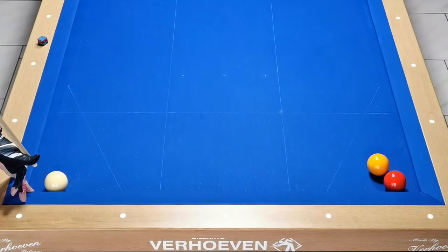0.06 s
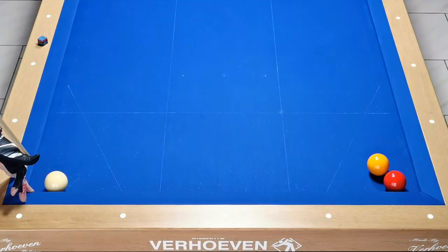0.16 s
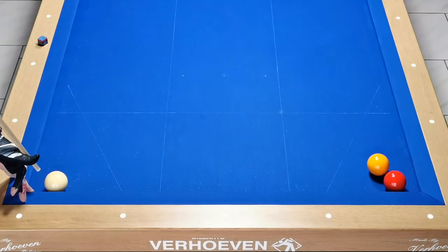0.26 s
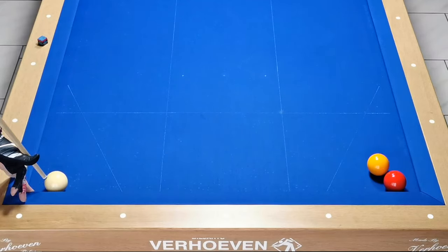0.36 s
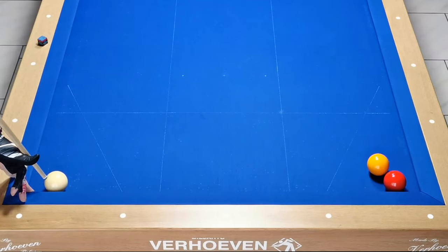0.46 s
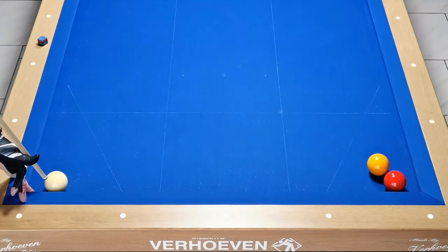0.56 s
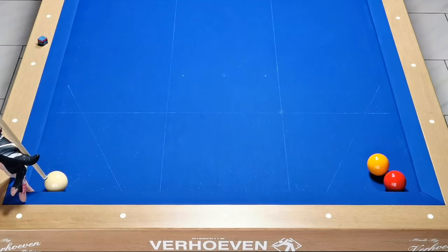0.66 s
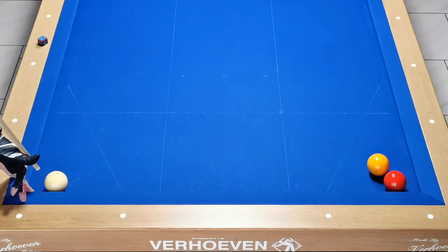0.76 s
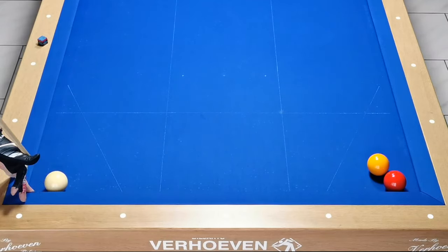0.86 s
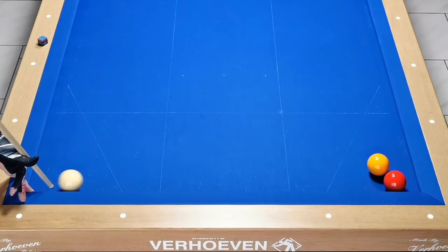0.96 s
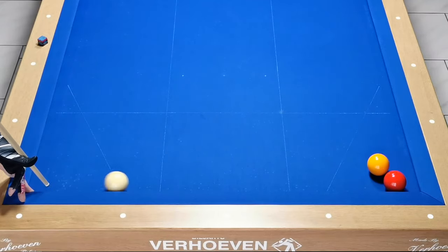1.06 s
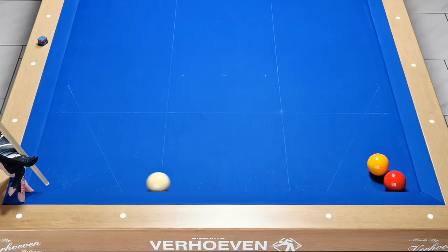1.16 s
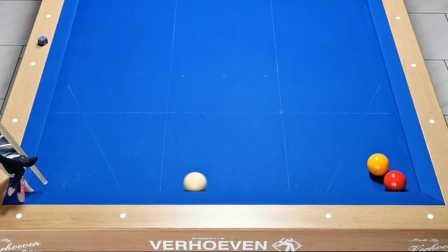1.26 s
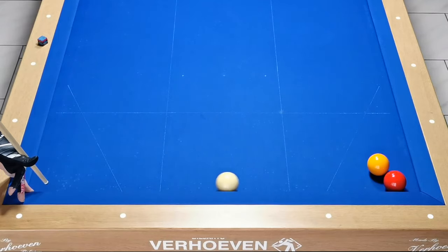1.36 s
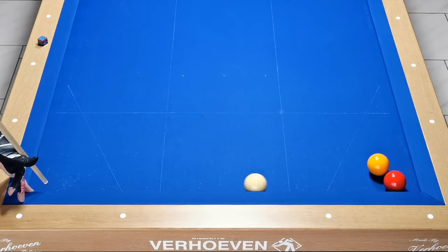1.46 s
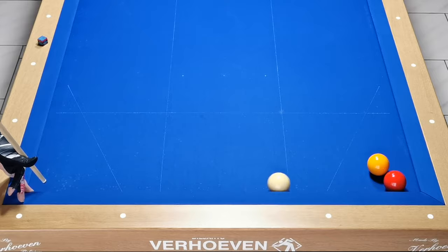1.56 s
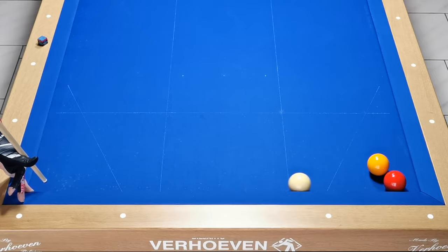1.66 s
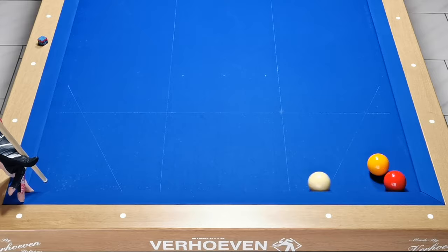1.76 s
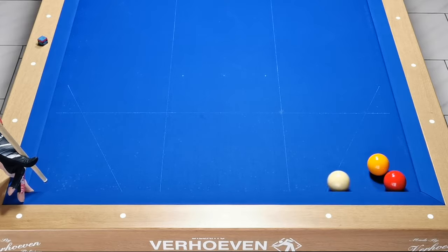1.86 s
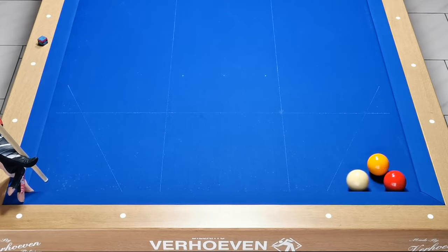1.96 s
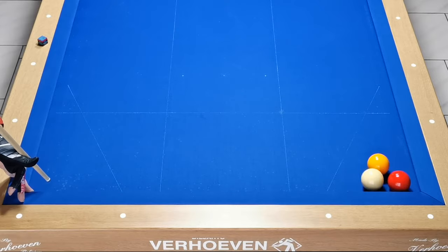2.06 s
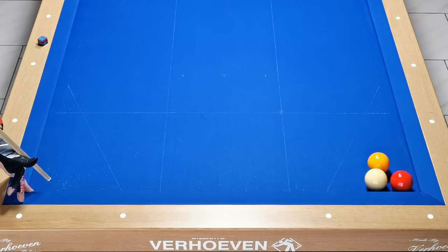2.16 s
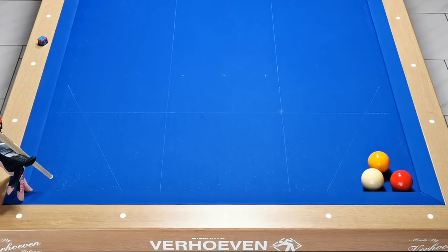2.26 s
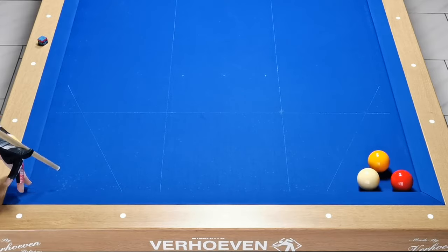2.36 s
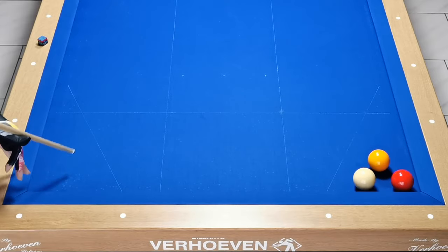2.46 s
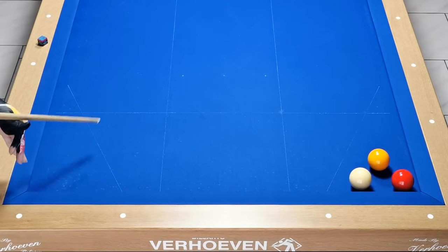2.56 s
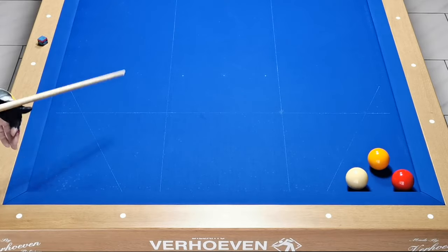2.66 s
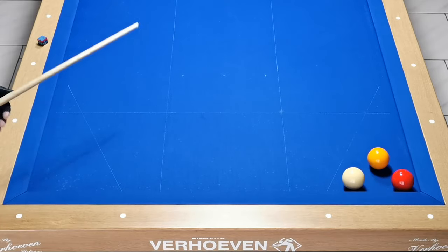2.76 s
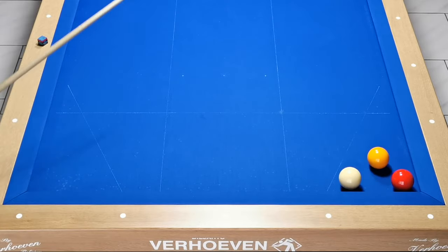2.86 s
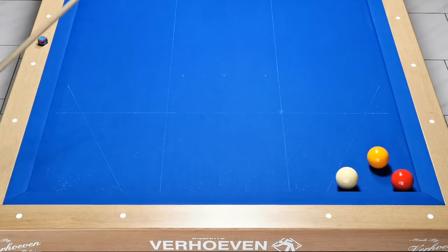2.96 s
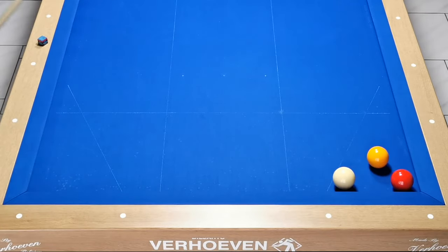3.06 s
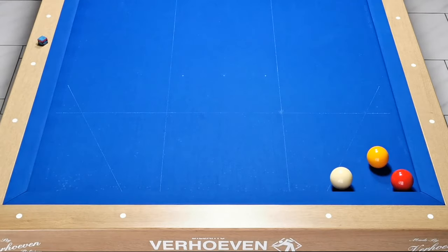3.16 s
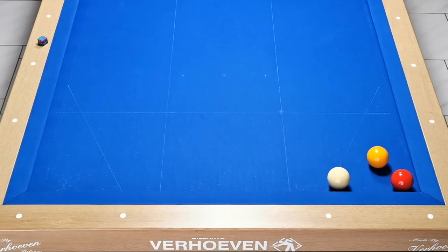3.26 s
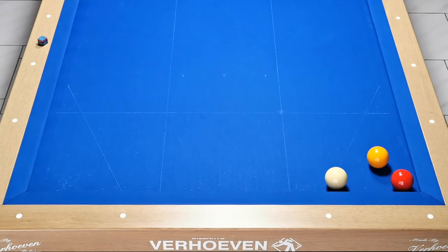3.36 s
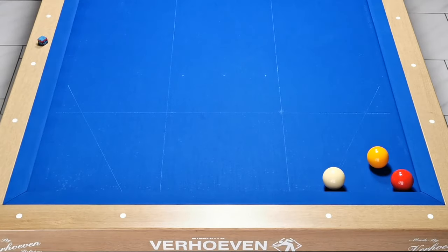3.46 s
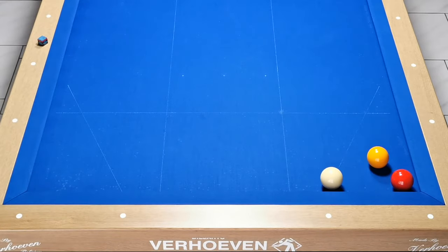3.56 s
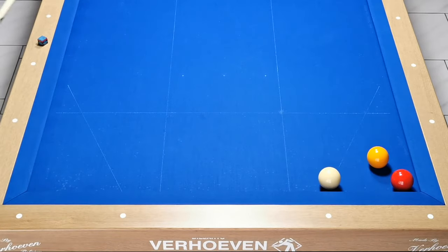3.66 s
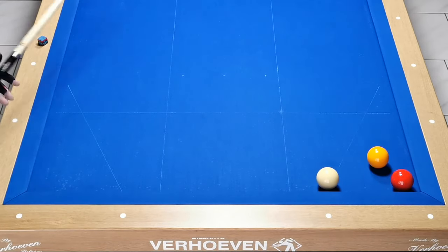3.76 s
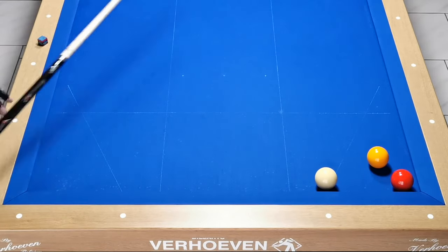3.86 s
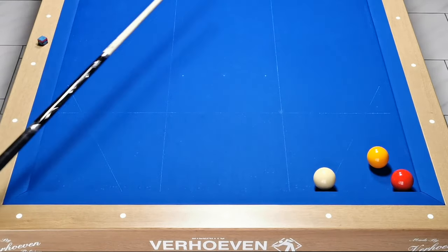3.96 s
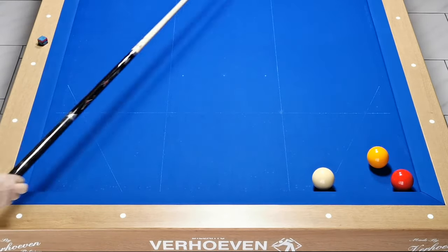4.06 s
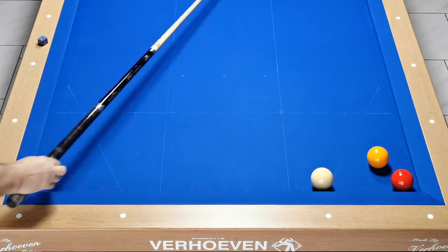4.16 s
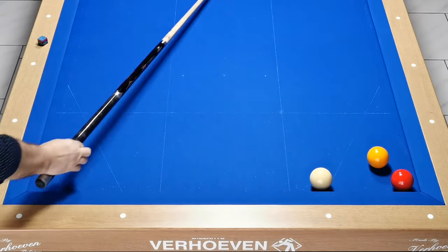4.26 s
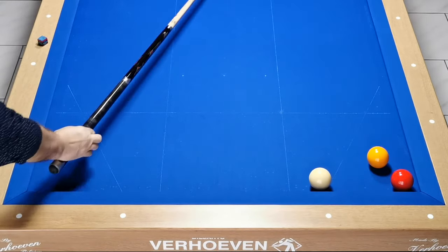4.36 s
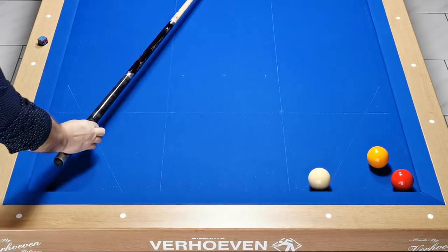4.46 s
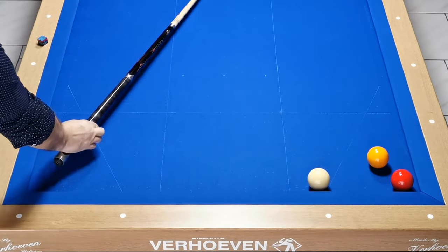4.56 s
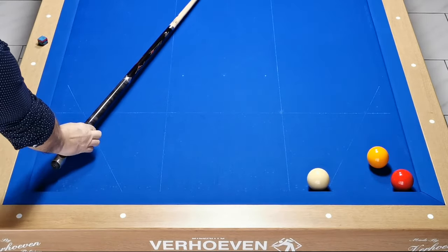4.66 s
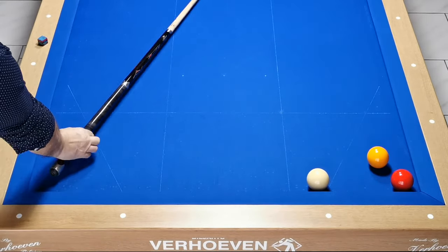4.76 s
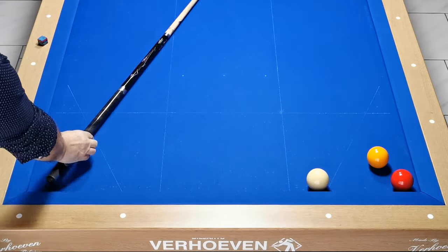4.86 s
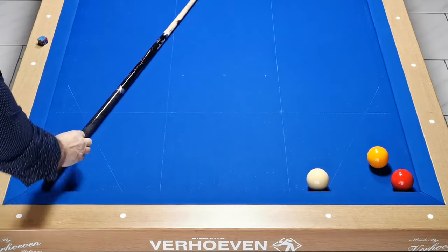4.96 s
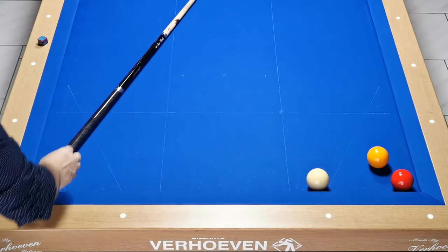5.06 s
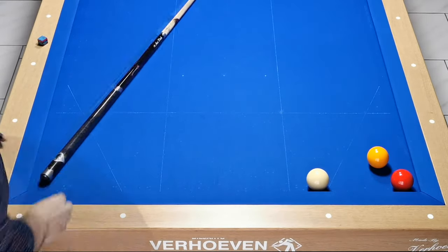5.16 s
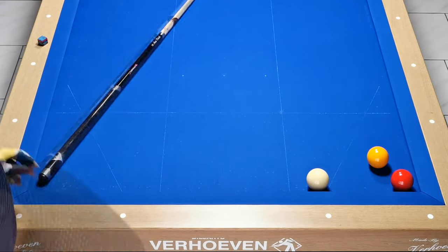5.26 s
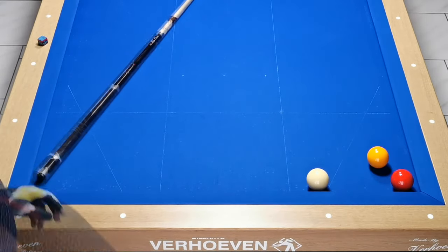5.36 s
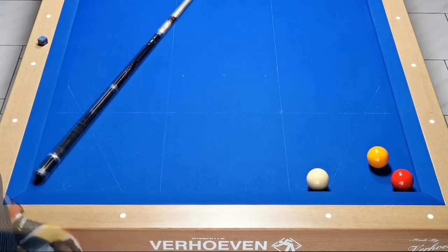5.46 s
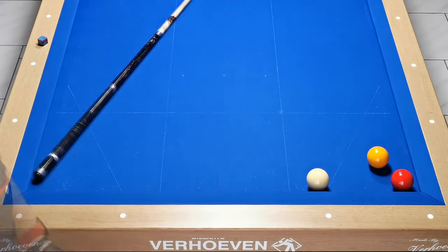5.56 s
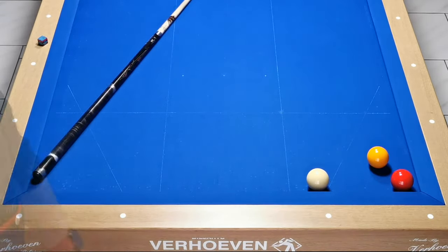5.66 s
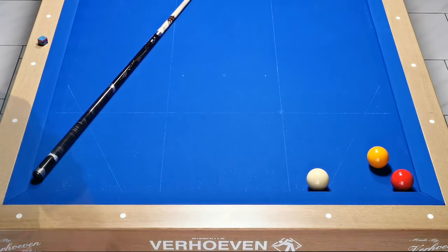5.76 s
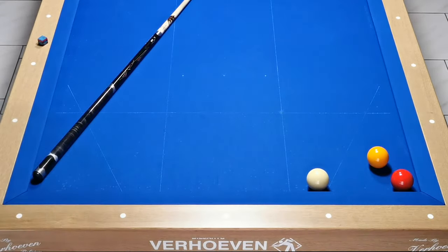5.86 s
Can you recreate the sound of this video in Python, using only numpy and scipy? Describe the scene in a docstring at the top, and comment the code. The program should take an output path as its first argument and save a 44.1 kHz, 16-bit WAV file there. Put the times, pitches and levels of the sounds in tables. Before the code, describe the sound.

A cue strikes a billiard ball with a blunt knock, two hard clacks follow, then the cue is laid down with a wooden clatter in an echoing room.

```python
"""First a cue strokes a billiard ball: a blunt pulse, its echoes and a short ring of the cue.
Then the ball clacks twice on others: short bursts near 2 kHz with a treble click, while the table drones.
Clothes rustle as shaped noise; the cue then taps, scrapes, drops and rattles on the table as ringing modes.
Last come a dry click, steps and soft bumps, and the table's drone is cut short and dies faster.
A hard-walled room answers the hits; wandering tones and noise make hum and hiss throughout."""
import sys
import numpy as np
from scipy import signal
from scipy.io import wavfile

SR = 44100
rng = np.random.default_rng(int(sys.argv[2]) if len(sys.argv) > 2 else 0)


def store_wav(level_fs):
    """Save 16-bit WAV to argv[1]."""
    pcm = np.round(np.clip(np.atleast_2d(level_fs), -1, 1) * 32767)
    wavfile.write(sys.argv[1], SR, pcm.T.astype(np.int16))


N = 260631  # length of the scene in samples

# colour of the leather tip on the ball: f/Hz, level/dB
TIP_COLOUR = [(50, -44.5), (144, -3), (250, -7), (450, -9), (620, -3), (1000, -9.5), (1400, -6.5),
              (2000, -13), (2350, -20.5), (3300, -25.5), (3750, -36), (6000, -47), (10000, -48.5),
              (15000, -74.5)]
# direct sound, then early echoes of the stroke: delay/ms, left level/dB, right level/dB
STROKE_PATHS = [(0, -0.5, -4), (1.6, -5.5, 7), (5.8, 3, -0.5), (10.6, -4, -4.5), (13.8, -3, 1),
                (17.6, -8.5, -2)]


def stroke(mix):
    """The tip drives the ball: a blunt, inverted pull of air, upright echoes duller with delay, the cue and the
    room."""
    start_s, level_db, room_db = 1.1072, -9, 10.6
    pulse = amp(level_db) * causal(lambda hz: read(TIP_COLOUR, hz))
    for ms, left_db, right_db in STROKE_PATHS:
        path = amp(level_db) * causal(
            lambda hz: read(TIP_COLOUR, hz) - 0.35 * ms * hz / 1000 + bell_db(hz, 1334, 1.0))
        sign = -1 if ms < 0.5 else 1  # the direct pull is negative, its echoes positive
        add(mix, start_s + ms / 1000, sign * amp([[left_db], [right_db]]) * path)
    cue_ring = amp(-18.5) * cue_modes(centre_hz=1150, octaves=0.11)
    add(mix, start_s, -cue_ring * np.ones((2, 1)))
    add(mix, start_s, amp(room_db) * room(pulse, start_ms=4.2, early_db=-3.5))


# ball on ball: t/s, level/dB, level of the earliest paths/dB
CLACKS = [(2.2131, -16.5, 1), (2.3584, -21.5, -3)]
# paths of a clack, the sideways first one weak:
# delay/ms, f/Hz, left level/dB, right level/dB, extra delay on the right/ms
CLACK_PATHS = [(0.4, 1560, -14, -18, 0.091), (0.06, 830, -25.5, -24, 0.12), (5, 1730, -10, -16, 0.4),
               (9, 1895, 1, 4.5, 0.45), (14, 1900, -4, -7, 0.36), (13.5, 1400, -26, -35, 0.1),
               (32.3, 1900, -14, -12, 0.3)]
# colour of the treble click: f/Hz, level/dB
CLICK_COLOUR = [(2500, -9), (4200, -18.5), (6400, -12.5), (8600, -8), (10600, -8), (12700, -6.5),
                (13600, -23.5), (15000, -18)]
# colour of a clack in the room: f/Hz, level/dB
CLACK_BODY_COLOUR = [(400, -25.5), (900, -11), (1400, -8), (1750, -6.5), (1980, 1), (2250, -7.5),
                     (3100, -22), (3500, -37), (4000, -27.5), (4800, -36.5), (5600, -43.5)]


def clacks(mix):
    """Hard balls give off a few cycles near 2 kHz and a treble click combed by a bounce off the bed."""
    bed_echo_ms, click_db, path_click_db, room_db = 0.47, -13.5, -15.5, -4
    scatter_t60_s = 0.018  # the click scatters off the near cushions
    swell_cycles = 0.57  # a burst peaks after four times this many cycles
    t = np.arange(400) / SR
    click = causal(lambda hz: read(CLICK_COLOUR, hz))[:400]
    bounce = 0.78 * np.roll(click, round(bed_echo_ms * SR / 1000))
    click = amp(click_db) * (click + bounce)
    body = causal(lambda hz: read(CLACK_BODY_COLOUR, hz))[:400]
    path_click = amp(path_click_db) * click
    for s, db, first_db in CLACKS:
        scatter = rng.standard_normal((2, 400)) * amp(-60 * t / scatter_t60_s)
        scattered = signal.fftconvolve(click[None], scatter, axes=1)
        add(mix, s, amp(db + first_db - 15.5) * scattered)
        for ms, hz, left_db, right_db, right_lag_ms in CLACK_PATHS:
            u = t * hz / swell_cycles / 4
            swell = (u * np.exp(1 - u)) ** 4
            burst = swell * np.sin(2 * np.pi * hz * t)
            if ms < 1:
                burst *= amp(first_db)
            add(mix[0], s + ms / 1000, amp(db) * (amp(left_db) * burst + path_click))
            add(mix[1], s + (ms + right_lag_ms) / 1000, amp(db) * (amp(right_db) * burst + path_click))
        add(mix, s, amp(db + room_db) * room(body + 0.73 * click, start_ms=35.0, early_db=-1.0))


# cue on the table: t/s, level/dB, centre f/Hz, spread/octaves, crack t60/s, joint level/dB, joint f/Hz,
# butt level/dB, return/ms (the wave thrown back from the near end of the shaft, different at each place)
BLOWS = [(4.4004, -38, 1220, 1.8, 0.13, 12, 2231, -10, 0.76),
         (4.706, -32.5, 1760, 0.86, 0.021, 7.5, 2256, -19.5, 0.32),
         (4.8005, -38.5, 1625, 1.18, 0.0074, 5, 2240, -10, .34),
         (4.981, -28, 644, 0.14, 0.093, -41.5, 2193, -35, .05),
         (4.9835, -21.5, 897, 2.08, 0.063, -4.5, 2190, -11, 0.45),
         (4.9882, -16, 3160, 0.62, 0.0071, -31.5, 2210, -41, 0.28),
         (5.022, -20, 3700, 0.6, 0.008, -19, 2224, -37, 0.47),
         (5.034, -25, 5600, 0.29, 0.019, -33, 2220, -46, 0.25),
         (5.0361, -27.5, 4570, 0.19, 0.0095, -27.5, 2180, -25.5, 0.32)]
# bright ring of the joint: share of its pitch/1, level/dB, t60/s, rise/s
JOINT = [(0.98, 1.5, 0.046, 0.0011), (1, -13.5, 0.035, 0.0017)]
# bounces off near surfaces: delay/ms, left level/dB, right level/dB
BLOW_ECHOES = [(4.984, -9, -11), (17.27, -14.5, -10), (33.73, -20.5, -10.5)]


def cue(mix):
    """A blow rings the cue modes near its own colour, the joint, the hollow butt and the slow-flexing shaft."""
    crack_db, crack_db_per_octave = -1, 2.5  # brighter blows crack harder, counted from 1 kHz
    room_db, dry_db_per_octave = 4, -3  # brighter blows send less into the room and the echoes
    right_over_left_db, knock_over_flex_db = 3, 2
    crack_top_hz = 10100  # wood cracks dull above this
    for s, db, centre_hz, octaves, crack_t60, joint_db, joint_hz, butt_db, return_ms in BLOWS:
        bright = np.log2(centre_hz / 1000)
        reflected_db = db + dry_db_per_octave * bright
        sound = cue_modes(centre_hz, octaves, return_ms)
        joint = 0
        for share, part_db, t60, rise in JOINT:
            hz = share * joint_hz
            joint = joint + amp(joint_db + part_db + return_db(hz, return_ms)) * ring(hz, t60, rise, 0.3)
        crack = causal(lambda hz: bell_db(hz, centre_hz, octaves) + return_db(hz, return_ms)
                       - 6 * (hz / crack_top_hz) ** 2)
        rattle = rng.standard_normal(1500) * amp(-60 * np.arange(1500) / SR / crack_t60)
        rattle[0] += 4.0  # the first contact stands out
        crack = np.convolve(crack[:300], rattle)
        add(sound, 0, amp(crack_db + crack_db_per_octave * bright) * crack / abs(crack).max())
        add(sound, 0, 0.27 * joint)
        add(mix, s, amp(reflected_db + room_db) * room(sound))
        add(sound, 0, 0.79 * joint)  # the joint beams toward the microphone
        add(mix[0], s, amp(db - right_over_left_db / 2) * sound)
        add(mix[1], s + 0.000071, amp(db + right_over_left_db / 2) * sound)
        for ms, left_db, right_db in BLOW_ECHOES:
            add(mix, s + ms / 1000, amp(reflected_db) * amp([[left_db], [right_db]]) * sound)
        knock = ring(296.5, t60=0.13, rise=0.0032, length=0.3)  # hollow butt
        flex = ring(188, t60=0.88, rise=0.11, length=0.89)  # slow bending of the shaft
        add(mix, s, amp(db + butt_db + knock_over_flex_db) * room(knock))
        add(mix, s, amp(db + butt_db) * flex * np.ones((2, 1)))


# modes of the cue: f/Hz, level/dB, t60/s
CUE_MODES = [(574, -9, 0.04), (630, -6, 0.035), (688, -2.5, 0.045), (765, -3, 0.07), (950, -1, 0.035),
             (1283, -3.5, 0.06), (1490, -4.5, 0.082), (1826, -7, 0.065), (2550, -6, 0.048),
             (2870, -2.5, 0.035), (3285, -7.5, 0.041), (3600, -13.5, 0.045), (3980, -15, 0.035),
             (4330, -18, 0.035), (5030, -20, 0.06), (5420, -27, 0.02), (5750, -34, 0.03)]


def cue_modes(centre_hz, octaves, return_ms=0):
    """The stick rings at its own fixed pitches, loudest near the colour of the blow."""
    total = 0
    for hz, db, t60 in CUE_MODES:
        mode_db = db + bell_db(hz, centre_hz, octaves) + return_db(hz, return_ms)
        total = total + amp(mode_db) * ring(hz, t60, 0.0014, 0.4)
    return total


def return_db(hz, return_ms):
    """A wave meeting its own return weakens some pitches and spares others, like a comb."""
    share = 0.45
    return 20 * np.log10(1 - share + share * abs(np.cos(np.pi * hz * return_ms / 1000)))


# the cue scrapes on the cloth: start t/s, hold end after start/s, level/dB
SCRAPES = [(4.81, 0.15, -60)]


def scrape():
    """Tiny slips of uneven size ring the upper modes of the cue, damped by the cloth."""
    slips_per_s, size_spread_db, damping_t60_s = 2100, 2.5, 0.05
    modes = cue_modes(centre_hz=5000, octaves=0.56)
    modes = modes * amp(-60 * np.arange(len(modes)) / SR / damping_t60_s)
    chance, size, sign = rng.random((3, 2, N))
    slips = (chance < slips_per_s / SR) * amp(-size_spread_db * np.log(size + 0.01)) * np.sign(sign - 0.5)
    slips = slips + 0.22 * slips[::-1]  # each side leaks into the other
    ringing = signal.fftconvolve(slips, modes[None], axes=1)[:, :N]
    return follow(SCRAPES, rise=0.087, t60=0.2) * evened(ringing)


# heavy blows into the table: t/s, level/dB, extra level of the rail/dB
THUMPS = [(1.108, -21, 0.5), (2.303, -64, 5.5), (4.984, -30.5, -4)]
# modes of slate and frame: f/Hz, level/dB, t60/s, rise/s
TABLE_MODES = [(27.2, -9, 1.3, 0.071), (41, -14.5, 1.3, 0.054), (80.7, -18.5, 1.6, 0.081),
               (62.9, -4.5, 2.27, 0.043), (107.54, -10, 0.59, 0.03), (128.13, -4, .7, 0.12),
               (139.6, -3, .7, 0.025), (166.8, -6.5, 0.44, 0.03), (227, -5.5, 0.5, 0.0071),
               (287, -5.5, 0.5, 0.0068), (338, -1.5, 0.38, 0.03), (57.1, -10, 1.25, 0.016)]


def table(mix):
    """Slate and frame drone after heavy blows, until the drone is cut short and dies faster."""
    cut_s, cut_t60_s = 5.54, 0.68
    drone = np.zeros((2, N))
    for s, db, rail_db in THUMPS:
        for hz, mode_db, t60, rise in TABLE_MODES:
            level_db = db + mode_db
            if 120 < hz < 150:  # modes of the rail, woken most by blows near it
                level_db += rail_db
            add(drone, s, sided(level_db, read(LEFT_OVER_RIGHT, hz)) * ring(hz, t60, rise, 4))
    since_cut = np.maximum(np.arange(N) / SR - cut_s, 0)
    mix += drone * amp(-60 * since_cut / cut_t60_s)


# small ticks: t/s, level/dB, centre f/Hz, spread/octaves
TICKS = [(1.1053, -45, 9330, 0.25), (1.107, -43.5, 5100, 0.45), (1.392, -61.5, 9400, 1.1),
         (2.869, -76.5, 907, 0.53), (2.9724, -69, 2500, 1.1), (3.1882, -66.5, 1480, 1.44),
         (3.7362, -52, 8870, 1.7), (3.748, -59, 7840, 0.55), (4.3202, -71.5, 2930, 0.54),
         (4.4052, -55.5, 5530, 0.15), (4.7052, -38, 2500, 0.29)]


def ticks(mix):
    """Tip, hand and cloth tick: a tiny pulse with fading random grit and a brief piece of room."""
    for s, db, centre_hz, octaves in TICKS:
        pulse = amp(db) * causal(lambda hz: bell_db(hz, centre_hz, octaves))[:300]
        grit = rng.standard_normal((2, 500)) * amp(-60 * np.arange(500) / SR / 0.052)
        grit[:, 0] += 4  # the first contact stands out
        gritty = signal.fftconvolve(pulse[None], grit, axes=1)
        add(mix, s, 0.46 * gritty + amp(14.0) * room(pulse)[:, :799])


def dry_click(mix):
    """One dry click: a single broad pulse, the same on both sides, without room."""
    pulse = causal(lambda hz: bell_db(hz, centre_hz=700, octaves=1.7))
    add(mix, 5.5338, amp(-48) * pulse * np.ones((2, 1)))


# soft low bumps as the player moves: t/s, level/dB, f/Hz, t60/s, rise/s
BUMPS = [(5.33, -54, 100.3, 2.4, 0.02), (5.548, -40.5, 257, 0.095, 0.014)]


def bumps(mix):
    """Each soft bump is one low mode that swells and dies, a little louder on the left."""
    for s, db, hz, t60, rise in BUMPS:
        add(mix, s, sided(db, 4) * ring(hz, t60, rise, 1))


def floor_sway(mix):
    """The floor gives under a step: a deep tone that swells and fades evenly about its middle."""
    middle_s, level_db, hz, half_length_s = 5.72, -41.5, 21.3, 0.1
    t = np.arange(N) / SR - middle_s
    swell = np.exp(-(t / half_length_s) ** 2 / 2)
    mix += sided(level_db, 4) * swell * np.sin(2 * np.pi * hz * t)


# low rumble of steps: start t/s, hold end after start/s, level/dB
RUMBLES = [(5.53, 0.022, -50), (5.78, .15, -59.5)]
# its colour: f/Hz, level/dB
RUMBLE_COLOUR = [(40, -8.5), (130, -3), (300, -20), (600, -25), (1500, -47.5)]


def steps():
    """Steps rumble as low, grainy noise."""
    return rubbing(RUMBLES, 0.011, 0.48, RUMBLE_COLOUR)


# rustling clothes: start t/s, hold end after start/s, level/dB
SWISHES = [(2.86, 0.15, -77), (3.1, 0.45, -75), (3.56, 0.18, -78.5), (3.72, 0.22, -71.5),
           (4.3, 0.11, -77.5), (5.12, 0.42, -74.5), (5.53, 0.06, -79.5), (5.62, .3, -77.5),
           (5.69, 0.35, -79.5), (5.81, 0.11, -82.5)]
# dull shuffling: start t/s, hold end after start/s, level/dB
SHUFFLES = [(2.86, 0.21, -74), (2.92, 0.1, -99), (3.18, 0.4, -82), (3.56, 0.062, -85), (3.74, 0.056, -93),
            (3.95, .45, -76), (5.535, 0.061, -64), (5.7, 0.27, -73)]
# colour of the rustle: f/Hz, level/dB
SWISH_COLOUR = [(800, 0), (2500, 3.5), (5000, 3), (9000, 3), (13000, -0.5), (15500, -49)]
# colour of the shuffling: f/Hz, level/dB
SHUFFLE_COLOUR = [(80, -2.5), (200, -6), (500, -4.5), (1200, -8), (3000, -17), (8000, -23.5)]


def clothes():
    """Rubbing cloth makes bright rustles and duller shuffles of noise."""
    swish = rubbing(SWISHES, 0.031, 0.34, SWISH_COLOUR)
    return swish + rubbing(SHUFFLES, 0.024, 0.75, SHUFFLE_COLOUR)


def rubbing(rows, rise, t60, colour):
    """Rubbing is coloured noise whose level flickers at random from moment to moment."""
    flicker_db = 1.5 * rng.standard_normal(N // 128 + 5)  # one value per noise frame
    return follow(rows, rise, t60) * evened(noise(N, lambda hz, t: read(colour, hz) + flicker_db))


# faint thin whistles: start t/s, hold end after start/s, level/dB, f/Hz
WHISTLES = [(2.93, 0.12, -80, 436), (2.95, .11, -86, 1250), (3.96, 0.39, -80.5, 1186),
            (4.09, 0.072, -79, 1185)]


def whistles():
    """Faint fuzzy tones whose pitch and level each waver by slow chance."""
    rate = 12  # multiplies the speeds listed in drift
    waver_hz = 7 * drift(rate)
    flutter = amp(2 * drift(rate))
    total = 0
    for *row, hz in WHISTLES:
        tone = fuzzy_tone(hz + waver_hz, width_hz=22, steady=1.4)
        total = total + follow([row], rise=0.015, t60=0.2) * tone * flutter
    return total


# mains hum: f/Hz, level/dB, width/Hz
HUM = [(102.5, -71.5, 3.9), (142.8, -85, 5.7), (198, -89, 5.8), (255, -94, 5.5), (300, -94.5, 6.5),
       (351, -86, 7.2)]


def mains_hum():
    """Mains hum is a stack of low tones, each wandering slightly."""
    total = 0
    for hz, db, width_hz in HUM:
        total = total + sided(db, read(LEFT_OVER_RIGHT, hz)) * fuzzy_tone(hz, width_hz, steady=7.4)
    return total


# colour of the hiss: f/Hz, level/dB
HISS_COLOUR = [(20, 6), (60, -0.5), (160, -6.5), (300, -11.5), (600, -19.5), (1000, -21.5), (2000, -22),
               (4000, -25), (10000, -29), (12500, -27.5), (15600, -48)]


def hiss():
    """Room and microphone hiss: steady noise, strongest in the bass."""
    # 0 * t spreads the colour over all frames
    return amp(-71) * evened(noise(N, lambda hz, t: read(HISS_COLOUR, hz) + 0 * t, size=4096))


# how long each band of the room lasts: f/Hz, t60/s
ROOM_T60 = [(100, 0.86), (260, 0.55), (700, 0.59), (1840, 0.61), (4850, 0.51), (8000, 0.43), (12800, 0.26)]


def room(x, start_ms=1.0, early_db=-2.0, early_s=0.07, bend_db=3.5):
    """Dense reflections off hard walls, each band dying at its own speed, faster as it goes."""
    step_s, step_db, step_width_s = 0.29, -3, 0.012  # the tail steps down this long after the hit

    def fade_db(hz, t):
        step = step_db / (1 + np.exp((step_s - t) / step_width_s))
        return -60 * t / read(ROOM_T60, hz) + early_db * np.exp(-t / early_s) - bend_db * t ** 2 + step

    tail = noise(SR, fade_db)
    tail *= np.clip(np.arange(SR) / (start_ms * SR / 1000), 0, 1) ** 2
    tail *= np.sqrt(2) / np.linalg.norm(tail)  # mean energy of the two sides is 1
    return signal.fftconvolve(x[None], tail, axes=1)


# likeness of left and right: f/Hz, likeness/1
SAME = [(60, 0.92), (130, 1), (290, 0.34), (640, 0.67), (1400, 0), (15000, 0.029)]
# balance of the sides: f/Hz, left over right level/dB
LEFT_OVER_RIGHT = [(60, 4), (110, 6.5), (200, 0.5), (380, 0), (700, -3.5), (2400, -2), (4400, 1),
                   (15000, -6)]


def noise(length, colour_db, size=512):
    """Stereo noise from random spectra, more alike in the bass; colour_db(Hz, s) shapes them."""
    hop = size // 4
    frames = length // hop + 5
    hz = np.fft.rfftfreq(size, 1 / SR)[:, None]
    t = np.arange(frames) * hop / SR
    a, b, c, d = rng.standard_normal((frames, len(hz), 4)).T
    same = np.clip(read(SAME, hz), 0, 1)
    left = a + 1j * b
    right = same * left + np.sqrt(1 - same ** 2) * (c + 1j * d)
    spectra = np.array([left, right]) * amp(colour_db(hz, t))
    half_db = read(LEFT_OVER_RIGHT, hz) / 2
    spectra *= amp([half_db, -half_db])
    return signal.istft(spectra, nperseg=size, noverlap=size - hop)[1][:, :length]


def fuzzy_tone(hz, width_hz, steady):
    """A tone whose height and phase wander; a larger steady part wanders less; rms 1."""
    pole = np.exp(-np.pi * width_hz / SR)
    chance = rng.standard_normal(N) + 1j * rng.standard_normal(N)
    wander = signal.lfilter([1], [1, -2 * pole, pole ** 2], chance)
    wander = steady + wander / np.sqrt(np.mean(abs(wander) ** 2))
    turning = np.exp(2j * np.pi * np.cumsum(hz * np.ones(N)) / SR)
    return evened((wander * turning).real)


def drift(rate):
    """Slow chance from six sine waves with random starts, rms 1."""
    t = np.arange(N) / SR
    waves = [np.sin(2 * np.pi * (f * rate * t + rng.random())) for f in (0.3, 0.5, 0.8, 1.1, 1.5, 2)]
    return evened(sum(waves))


def follow(rows, rise, t60):
    """Gain over time of rubs that rise, hold and fade."""
    t = np.arange(N) / SR
    gain = 0
    for s, length, db in rows:
        fade_db = -60 * np.maximum(t - s - length, 0) / t60
        gain = gain + np.clip((t - s) / rise, 0, 1) ** 2 * amp(db + fade_db)
    return gain


def ring(hz, t60, rise, length):
    """A mode that swells and dies; t60 is the time to fall 60 dB."""
    t = np.arange(round(length * SR)) / SR
    return amp(-60 * t / t60) * (1 - np.exp(-t / rise)) * np.sin(2 * np.pi * hz * t)


def causal(colour_db, size=4096):
    """Shortest (minimum-phase) pulse with the colour given as a function of Hz; peak 1."""
    hz = abs(np.fft.fftfreq(size, 1 / SR))
    log_gain = np.log(amp(np.maximum(colour_db(hz), -100)))
    pulse = np.fft.ifft(np.exp(np.conj(signal.hilbert(log_gain)))).real[:size // 2]
    return pulse / abs(pulse).max()


def bell_db(hz, centre_hz, octaves):
    """A hump of colour, 6 dB down at the given octaves on both sides of its centre."""
    return -6 * (np.log2((hz + 1) / centre_hz) / octaves) ** 2


def amp(db):
    """Decibels to a plain factor."""
    return 10 ** (np.asarray(db, float) / 20)


def sided(db, left_over_right_db):
    """Left and right factors around one level."""
    return amp([[db + left_over_right_db / 2], [db - left_over_right_db / 2]])


def evened(x):
    """Scale to rms 1."""
    return x / np.sqrt(np.mean(x ** 2) + 1e-30)


def read(points, hz):
    """Read a curve between its points, along log frequency."""
    f, value = np.transpose(points)
    return np.interp(np.log(hz + 1), np.log(f + 1), value)


def add(mix, s, sound):
    """Add a sound into the mix from time s in seconds, cut at the end."""
    part = mix[..., round(s * SR):][..., :sound.shape[-1]]
    part += sound[..., :part.shape[-1]]


def scene():
    """Add the hits, the rubbing and the background together."""
    hits = np.zeros((2, N))
    for source in (stroke, clacks, cue, table, ticks, dry_click, bumps, floor_sway):
        source(hits)
    return hits + scrape() + steps() + clothes() + whistles() + mains_hum() + hiss()


def record(dry):
    """The band limit of the recorder: a steep low-pass filter."""
    low_pass = signal.firwin(511, 15750, window=("kaiser", 9), fs=SR)  # edge in Hz
    return signal.oaconvolve(dry, low_pass[None], "same")


dry = scene()
out = record(dry)
store_wav(out)
```